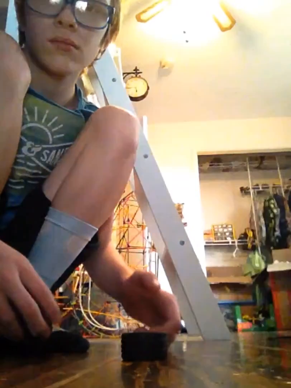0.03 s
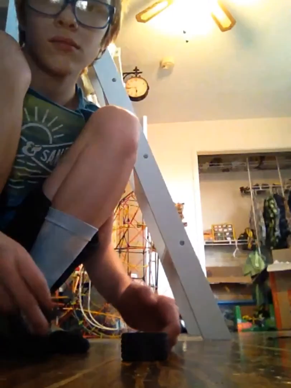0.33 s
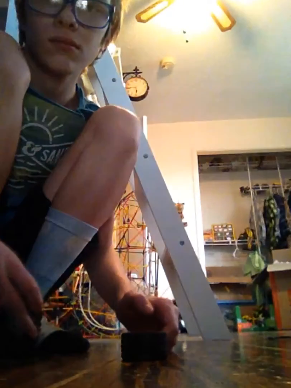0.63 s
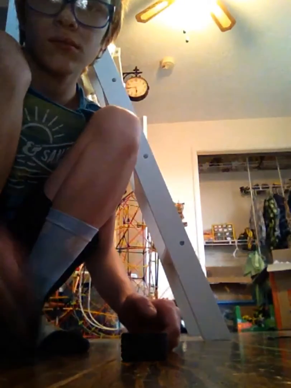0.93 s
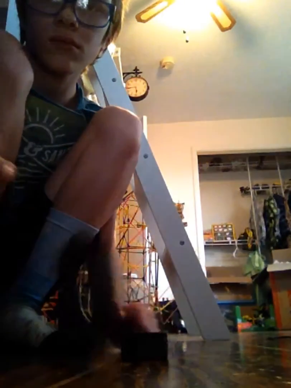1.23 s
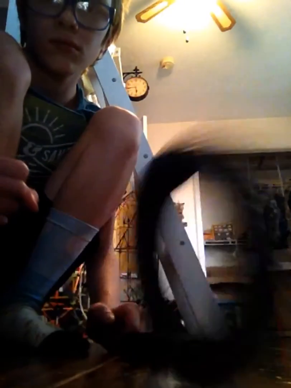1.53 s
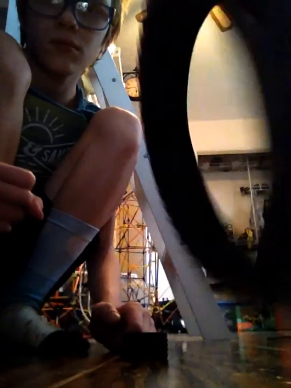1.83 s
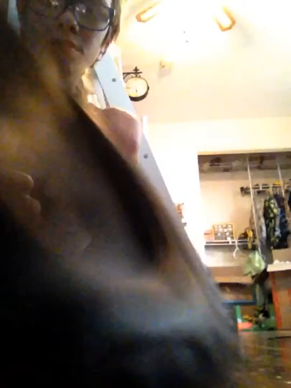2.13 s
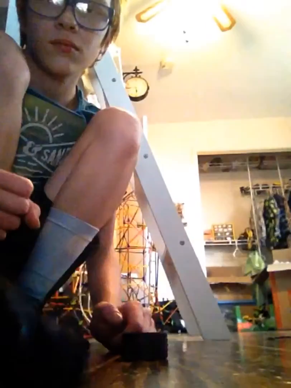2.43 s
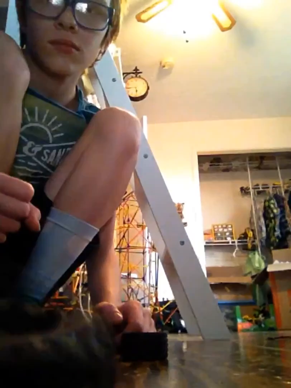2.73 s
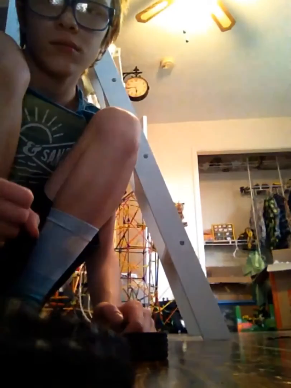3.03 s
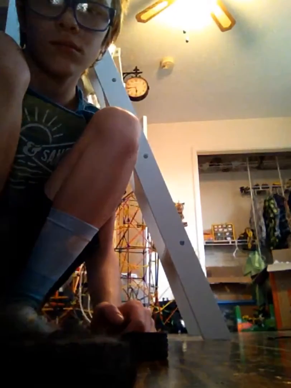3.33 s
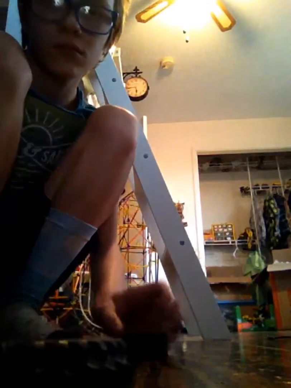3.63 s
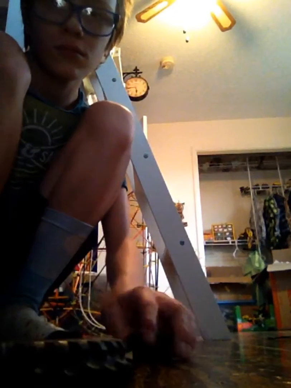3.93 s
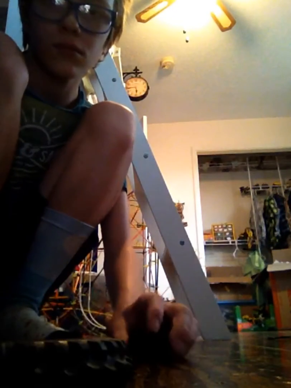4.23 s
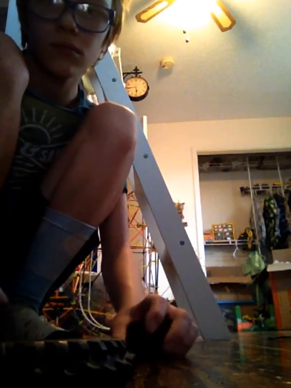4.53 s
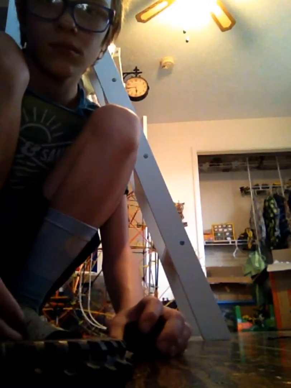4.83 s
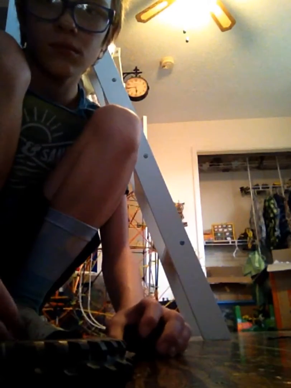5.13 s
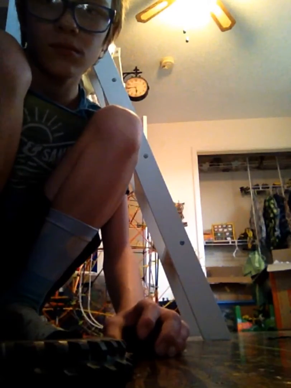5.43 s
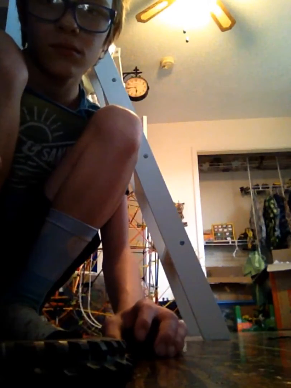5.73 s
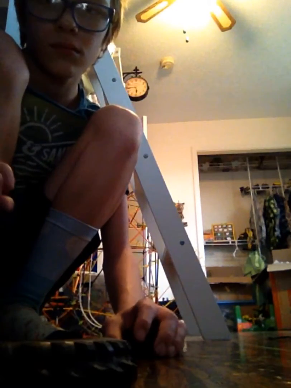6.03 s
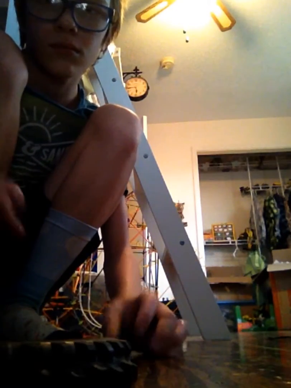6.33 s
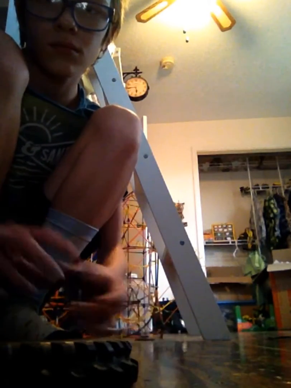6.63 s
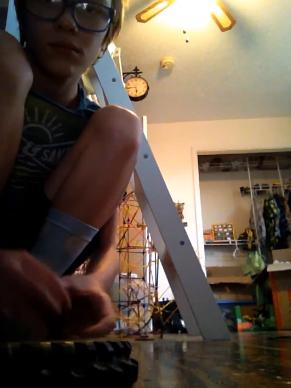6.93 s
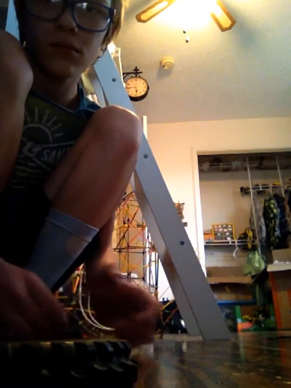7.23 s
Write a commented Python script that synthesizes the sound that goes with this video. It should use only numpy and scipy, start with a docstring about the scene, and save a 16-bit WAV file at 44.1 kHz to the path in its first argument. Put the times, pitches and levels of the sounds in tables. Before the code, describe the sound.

A small rubber tire rolls across a wooden floor, bounces close by with sharp thumps, then topples and wobbles to rest.

```python
"""A living room with a hard wooden floor: a small rubber tire rolls, bounces close by, topples and
wobbles to rest. Each impact excites the damped modes of the boards and of the hollow carcass, and the
tread scuffs after it; once down, the tire also grazes before each knock and rocks back after it.
At the start the floor groans by stick-slip under a shifting weight; a hand taps early and late.
The room reverberates, over the low hum of a fan and microphone hiss."""
import sys
import numpy as np
from scipy import signal
from scipy.fft import rfft, irfft
from scipy.io import wavfile

SR = 44100
rng = np.random.default_rng(int(sys.argv[2]) if len(sys.argv) > 2 else 0)


def file_out(sig):
    """Save sig as 16-bit WAV at sys.argv[1]."""
    # one column per channel
    cols = np.atleast_2d(sig).T
    # limit, then scale
    lim = np.clip(cols, -1, 1)
    pcm = np.round(lim * 32767).astype(np.int16)
    wavfile.write(sys.argv[1], SR, pcm)


N = 329868
TIME = np.arange(N) / SR
RING_TIME = np.arange(int(.2 * SR)) / SR

# Impacts of the tire on the floor. Each row: start in seconds, thump pitch in Hz, thump level in dB,
# clack level in dB, hardness (treble over body) in dB, board pitch in Hz, clack pitch in Hz.
TIRE_IMPACTS = [(1.6781, 98.5, -25.5, -33.5, -13.5, 470, 1100), (1.694, 95, -54, -46, -23, 467, 1400),
                (1.727, 117, -34.5, -51, -19, 400, 1000), (1.7605, 111, -40.5, -69, -18, 510, 1600),
                (1.9465, 166.6, -22, -26.5, -5.5, 340, 2680), (2.1409, 108.4, -13, -27.5, 3.5, 330, 2480),
                (2.1537, 111.7, -62, -67, 25, 312, 2250), (2.2222, 105, -18, -36, 7, 380, 1620),
                (2.2336, 115, -25, -43.5, -2, 452, 4100), (2.259, 103, -56, -73, 14, 300, 4100),
                (2.3866, 120.8, -17.5, -24, -1, 634, 1850), (2.4142, 137, -37, -40, 9.5, 580, 2325),
                (2.4307, 127, -23.5, -36.5, 0, 670, 1790), (2.5341, 109, -56, -65, 14, 580, 3550),
                (2.7107, 148, -42, -48, -2, 750, 1460), (2.7333, 115, -34.5, -41.5, -10, 514, 2500),
                (3.0025, 114, -35.5, -44, -2.5, 424, 2220), (3.0799, 118, -50, -55, 4, 362, 2750),
                (3.2352, 121, -37.5, -40.5, -6, 460, 1550), (3.332, 96, -45, -58, -28, 300, 864),
                (3.4075, 102, -40, -37.5, 5, 770, 1670), (3.5176, 111.5, -40, -42.5, 0, 496, 1780),
                (3.5856, 100, -41.5, -46, -18, 496, 940), (3.727, 129, -34, -38.5, -16.5, 370.4, 950),
                (3.945, 98, -44.5, -54, -14, 370, 900)]
# Modes of the struck boards, the hollow carcass and the groaning floor.
# Each row: frequency in Hz, relative level in dB, time to decay by 60 dB in seconds.
BOARD_MODES = [(310, -6, .05), (425, 0, .04), (495, -5, .03), (575, -9, .025), (700, -6, .025),
               (1040, -3, .014), (1300, -6, .01), (1520, -1, .012), (1800, -6, .013), (2330, 0, .012),
               (2740, 2, .014), (3380, 1, .017), (4120, -14, .04), (4700, -6, .007), (6200, -17, .004)]
CARCASS_MODES = [(66, -19, .13), (138, -23, .13), (198, -12, .075), (302, -10, .07), (405, -17, .055)]
FLOOR_MODES = [(138, -6, .1), (175, -13, .05), (280, -9, .025), (390, -3, .022), (475, 0, .032),
               (690, -8, .016), (880, -7, .012), (1110, 0, .015), (1430, -8, .012), (1850, -5, .01),
               (2900, -8, .004)]
# Body, knock, slap and tick bands of an impact. Each row: lower edge in Hz, upper edge in Hz.
IMPACT_BANDS = [(190, 780), (800, 1900), (2200, 3800), (3950, 9000)]
# Their levels. Each row: offset from the clack in dB, dB per dB of hardness, share of the hollow lift.
IMPACT_BAND_LEVELS = [(2, -0.17, 0), (-5, 0.22, 1), (-0.5, 0.76, 0), (-15.5, 0.8, 0)]
# Rolling, sliding and shifting on the boards.
# Each row: start in seconds, length in seconds, rumble level in dB, brushing level in dB.
FLOOR_SLIDES = [(0.248, 0.49, -53, -60.5), (.98, 0.47, -53.5, -64), (1.42, 0.35, -52, -61),
                (1.822, 0.54, -55.5, -79.5), (2.41, 0.21, -50, -66), (2.95, 0.83, -55.5, -72),
                (3.711, 0.25, -63, -54.5), (4.095, .12, -62, -60), (4.35, 0.15, -73, -60.5),
                (5.09, 1.23, -63, -72.5), (6.47, 0.11, -57, -74), (6.894, 0.29, -61, -71.5)]
# Spectra of the rumble, the brushing, the reverberant tail and the room tone with its hiss.
# Each row: frequency in Hz, relative level in dB.
RUMBLE_SPECTRUM = [(35, -28), (70, 9), (130, 1.5), (280, -8.5), (500, -12.5), (1000, -43), (2500, -49.5)]
BRUSH_SPECTRUM = [(150, -2), (500, 8.5), (1000, 8), (1550, 5), (2150, 2.5), (3300, 0), (4500, -5.5),
                  (9000, -15)]
TAIL_SPECTRUM = [(40, 18), (80, 0), (150, 5.5), (300, 0), (700, 10), (1500, 0.5), (3000, 1), (5000, -8),
                 (9000, -16)]
ROOM_TONE_SPECTRUM = [(18, -61), (30, -33), (59, -34), (80, 15.5), (102, -46), (129, -5.5), (219, 3),
                      (278, -4.5), (306, 2.5), (472, -5), (762, -3.5), (1140, -10), (1390, -4.5),
                      (2130, -13), (9200, -13.5), (12000, -141), (20200, -120)]
# Stick-slip groans. Each row: start in seconds, length in seconds, body level in dB, brightness in dB.
FLOOR_GROANS = [(0.0683, 0.0035, -34.5, -19), (0.0758, 0.015, -28, 7.5), (0.108, 0.0087, -41, 3),
                (0.13, 0.0065, -37, -7), (.155, 0.0045, -52, 0), (0.53, 0.0076, -33, -2),
                (.556, 0.012, -32, 6), (0.591, 0.0047, -32, 6), (.614, 0.0066, -34, 9),
                (0.642, .007, -33, -5.5), (0.656, 0.0069, -36, -10.5), (0.684, 0.0061, -42.5, -3)]
# Low, body, knock and grit bands of a groan. Each row: lower edge in Hz, upper edge in Hz.
GROAN_BANDS = [(85, 175), (215, 620), (830, 1400), (1550, 3700)]
# Their levels. Each row: offset from the body level in dB, dB per dB of brightness.
GROAN_BAND_LEVELS = [(-1, -.5), (0, 0), (-10, .5), (-25, -0.03)]
# Taps of a hand on the floor. Each row: start in seconds, thump level in dB, clack level in dB,
# hardness in dB, clack pitch in Hz.
HAND_TAPS = [(0.3023, -45, -48, -28, 1010), (0.3136, -44, -62.5, -4, 1860), (.341, -43, -57.5, -10, 880),
             (.467, -42, -43, 1, 2920), (0.4704, -34, -44, 1, 2200), (.4818, -34, -42.5, -4, 2200),
             (0.5817, -35, -45.5, -9.5, 3730), (4.4, -60, -69, 11, 1480), (5.02, -49, -65, -6, 930),
             (5.8318, -43.5, -46, -3, 2107), (5.9892, -40, -57.5, -8, 1410), (6.091, -45, -63, -12, 1930),
             (6.1753, -52, -68, 1, 2980), (6.2394, -48, -78, -13, 920), (6.87, -46, -70, -17, 920),
             (7.382, -52, -85, -5, 920)]
# Reflections from near surfaces. Each row: delay in seconds, gain in dB.
REFLECTIONS = [(0.011, -15), (0.0148, -19), (0.0255, -25)]
# Share of sound sent to the room, least when the tire is nearest. Each row: time in seconds, gain in dB.
ROOM_SHARE = [(0, -0.5), (1.68, 1), (2.14, -10.5), (2.75, 0), (5.8, 6.5)]
# Soft resonances of the fan's hum. Each row: centre in Hz, bandwidth in Hz, rms level in dB.
FAN_RESONANCES = [(144, 32, -65), (1386, 37, -84.5), (676, 47, -81)]


def tire_bounces(toppled_s=2.6, graze_lead_s=.0085, rock_gap_s=.028, rock_loss_db=6.5):
    """Inelastic impacts: once toppled, the tire grazes, lands and rocks back twice, losing energy."""
    out = np.zeros(N)
    for start, thump_hz, thump_db, clack_db, hardness_db, *pitches in TIRE_IMPACTS:
        add(out, start, impact(thump_hz, thump_db, clack_db, hardness_db, *pitches))
        if start > toppled_s:
            graze_db = clack_db - 14.5  # one edge touches just before the tread
            add(out, start - graze_lead_s, impact(thump_hz, graze_db, graze_db, hardness_db, *pitches))
            for _ in range(2):
                start += rock_gap_s * np.exp(.15 * rng.standard_normal())
                thump_db -= rock_loss_db
                add(out, start, impact(thump_hz, thump_db, thump_db - 11.5, -11, *pitches))  # soft, dull
    return out


def impact(thump_hz, thump_db, clack_db, hardness_db, board_hz, clack_hz,
           hollow_db=9, clack_lift_db=7, cutoff_hz=4300):
    """Impulsive excitation: a blow rings the boards, and a harder contact gives more treble over body."""
    out = np.zeros(len(RING_TIME))
    crack, flutter = rng.standard_normal((2, len(RING_TIME))) * [decay(.044), decay(.12)]
    blow = modal_ring(BOARD_MODES, scatter_db=1.5, detune=.02) + undb(-2) * crack
    blow = emphasise(blow, clack_hz, clack_lift_db)
    blow = emphasise(blow, board_hz, db=7) + undb(-21) * flutter
    blow = band(blow, cutoff_hz, "lowpass")  # a soft surface rounds off the top
    # hollow lift: a spot whose clack lies near 1384 Hz drives the whole knock band
    octaves_off = np.log2(clack_hz / 1384)
    lift_db = hollow_db * np.exp(-(octaves_off / .66) ** 2)
    for edges, (offset_db, slope, share) in zip(IMPACT_BANDS, IMPACT_BAND_LEVELS):
        band_db = clack_db + offset_db + slope * hardness_db + share * lift_db
        out -= burst(band(blow, edges, "bandpass", order=4), band_db)
    add(out, .0018, burst(carcass_thump(thump_hz, thump_db), thump_db))  # just after the first touch
    return out


def carcass_thump(hz, blow_db, swell_s=.004, lag_s=.01):
    """Damped oscillation: the carcass squashes and springs back; stronger blows ring more hollow."""
    envelope = RING_TIME / swell_s * np.exp(1 - RING_TIME / swell_s)
    squash = envelope * np.sin(2 * np.pi * hz * RING_TIME)
    hollow = modal_ring(CARCASS_MODES, scatter_db=1, detune=.01) * (1 - np.exp(-RING_TIME / lag_s))
    hollow_db = 4 + .14 * (blow_db + 26)
    return band(squash + undb(hollow_db) * hollow, 63, "highpass")


def rolling(attack_s=.05, release_s=.22, scuff_t60=.16):
    """Rolling and friction noise: tread blocks rumble, while slides and scuffs brush the boards."""
    lumps = rng.standard_normal(N) * undb(3 * wander(35))
    rumble = band(colour(lumps, RUMBLE_SPECTRUM), 60, "highpass", order=4)
    scratches = rng.standard_normal(N) * undb(3 * wander(170))
    brush = colour(scratches, BRUSH_SPECTRUM)
    rumble_gain, brush_gain = np.zeros((2, N))
    for start, length, rumble_db, brush_db in FLOOR_SLIDES:
        rise = (TIME - start) / attack_s
        fall = (start + length - TIME) / release_s + .5
        swell = np.clip(np.minimum(rise, fall), 0, 1)
        rumble_gain += undb(rumble_db) * swell
        brush_gain += undb(brush_db) * swell
    for start, _, _, clack_db, *_ in TIRE_IMPACTS:  # the tread scuffs after each knock
        add(brush_gain, start, undb(-28.5 + .5 * clack_db) * decay(scuff_t60))
    return level(rumble, 0) * rumble_gain + level(brush, 0) * brush_gain


def floor_groans(slip_hz=380, unevenness=.3):
    """Stick-slip friction: short runs of uneven slips drive the dull, woody modes of the floor."""
    out = np.zeros(N)
    for start, length, body_db, brightness_db in FLOOR_GROANS:
        gap_scatter, size_scatter = rng.standard_normal((2, 32))
        gaps = np.exp(unevenness * gap_scatter) / slip_hz
        slip_times = np.cumsum(gaps) - gaps[0]
        within = slip_times < length
        slips = np.zeros(len(RING_TIME))
        slips[(slip_times[within] * SR).astype(int)] = undb(2 * size_scatter[within])
        response = modal_ring(FLOOR_MODES, scatter_db=1.5, detune=.02)
        wood = signal.fftconvolve(slips, response)[:len(RING_TIME)]
        for edges, (offset_db, slope) in zip(GROAN_BANDS, GROAN_BAND_LEVELS):
            band_db = body_db + offset_db + slope * brightness_db
            add(out, start, burst(band(wood, edges, "bandpass", order=3), band_db, length))
    return out


def hand_taps(thump_hz=121.4, board_hz=400):
    """Local excitation: a small, soft finger thumps at one pitch and favours the mode beneath it."""
    out = np.zeros(N)
    for start, thump_db, clack_db, hardness_db, clack_hz in HAND_TAPS:
        add(out, start, impact(thump_hz, thump_db, clack_db, hardness_db, board_hz, clack_hz,
                               hollow_db=21, clack_lift_db=11, cutoff_hz=4470))
    return out


def room(x, low_t60=.57, high_t60=.5, build_s=.0013):
    """Reverberation: a few early reflections and a diffuse tail whose treble dies a little sooner."""
    t = np.arange(SR) / SR
    noise = colour(rng.standard_normal(SR), TAIL_SPECTRUM)
    low = band(noise, 566, "lowpass") * decay(low_t60, t)
    high = band(noise, 420, "highpass") * decay(high_t60, t)
    tail_gain = undb(-14) / np.sqrt(SR * low_t60 / np.log(1e6))
    response = (low + high) * (1 - np.exp(-t / build_s)) * tail_gain
    for delay, db in REFLECTIONS:
        response[int(delay * SR)] += undb(db)
    return signal.fftconvolve(x, response)[:N]


def ambience():
    """Stationary noise: broadband room tone and microphone hiss, with a fan's narrow bands of hum."""
    out = level(colour(rng.standard_normal(N), ROOM_TONE_SPECTRUM), -59.5)
    for hz, width, db in FAN_RESONANCES:
        hum = band(rng.standard_normal(N), [hz - width / 2, hz + width / 2], "bandpass", order=1)
        out += level(hum, db)
    return out


def modal_ring(modes, scatter_db, detune):
    """Superposition of damped modes: weights and pitches vary at random, as with the spot struck."""
    hz, db, t60 = np.transpose(modes)[:, :, None]
    weight, shift = rng.standard_normal((2, len(hz), 1))
    waves = np.cos(2 * np.pi * hz * (1 + detune * shift) * RING_TIME)
    return np.sum(undb(db + scatter_db * weight) * waves * decay(t60), axis=0)


def emphasise(x, hz, db):
    """Resonance: the struck spot lifts the modes near one pitch."""
    return x + (undb(db) - 1) * signal.lfilter(*signal.iirpeak(hz, Q=4, fs=SR), x)


def decay(t60, t=RING_TIME):
    """Exponential damping: 60 dB down after t60 seconds."""
    return np.exp(-np.log(1000) * t / t60)


def undb(db):
    """The decibel law: level to amplitude ratio."""
    return 10 ** (np.asarray(db) / 20)


def level(x, db):
    """Power normalisation: scale to an rms level."""
    return x * undb(db) / np.sqrt(np.mean(x ** 2))


def burst(x, db, length_s=.01):
    """Energy normalisation: the rms level is db if all the energy is counted within length_s."""
    return x * undb(db) * np.sqrt(length_s * SR / np.sum(x ** 2))


def band(x, hz, kind, order=2):
    """Frequency selection by a causal, maximally flat filter."""
    return signal.sosfilt(signal.butter(order, hz, kind, fs=SR, output="sos"), x)


def colour(x, spectrum):
    """Spectral shaping: gains in dB are interpolated over log frequency."""
    hz, db = np.transpose(spectrum)
    bin_hz = np.maximum(np.arange(len(x) // 2 + 1) * SR / len(x), 1)
    return irfft(rfft(x) * undb(np.interp(np.log(bin_hz), np.log(hz), db)), len(x))


def wander(rate_hz):
    """Random modulation: normal values joined by straight lines."""
    return np.interp(TIME * rate_hz, np.arange(4096), rng.standard_normal(4096))


def add(track, start_s, x):
    """Superposition: mix a sound in at a given time."""
    i = max(int(start_s * SR), 0)
    track[i:i + len(x)] += x[:len(track) - i]


def scene():
    """Direct plus reverberant field of the impacts and groans, over the rolling and the ambience."""
    direct = tire_bounces() + hand_taps() + floor_groans()
    room_share = undb(np.interp(TIME, *np.transpose(ROOM_SHARE)))
    return (direct + room(direct * room_share) + rolling() + ambience())[None]


def record(dry):
    """Band limiting: a phone lying on the floor thins the deep bass and cuts the top."""
    top_cut = signal.ellip(10, .2, 60, 9350, fs=SR, output="sos")
    return signal.sosfilt(top_cut, band(dry, 58, "highpass"))


dry = scene()
out = record(dry)
file_out(out)
```